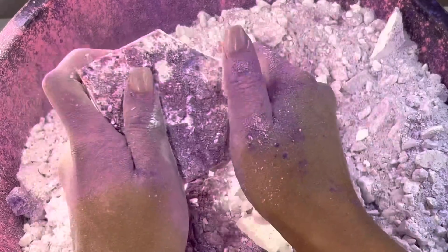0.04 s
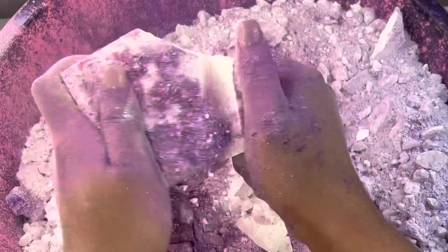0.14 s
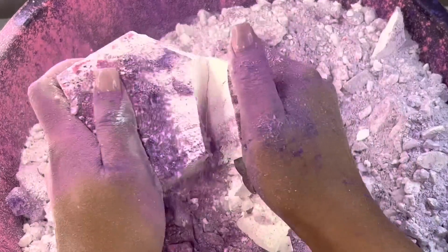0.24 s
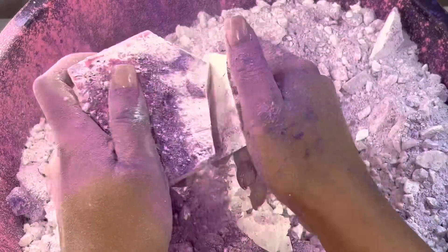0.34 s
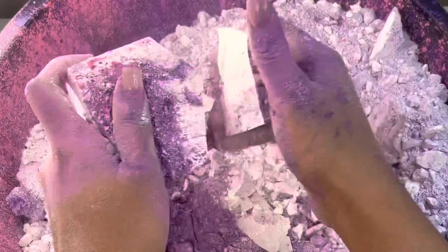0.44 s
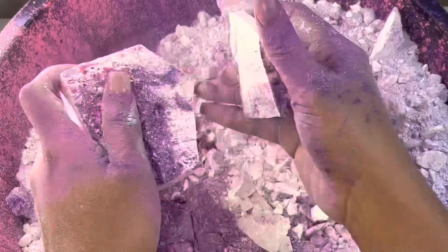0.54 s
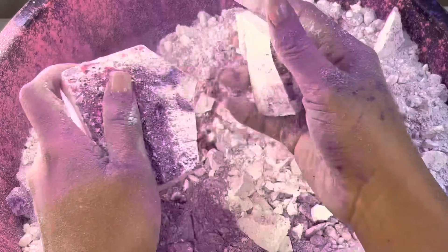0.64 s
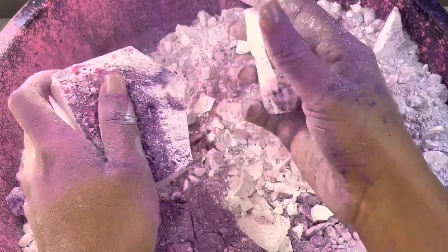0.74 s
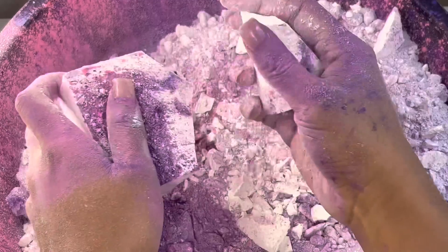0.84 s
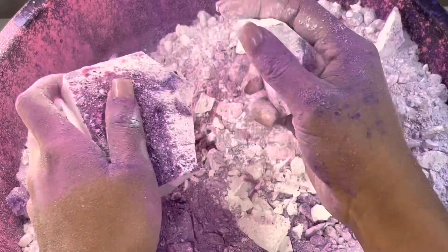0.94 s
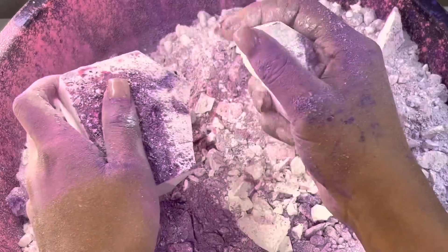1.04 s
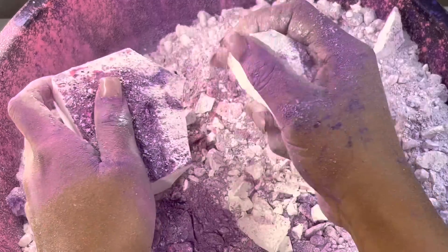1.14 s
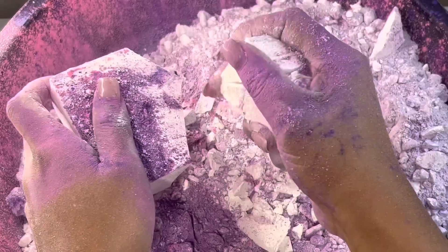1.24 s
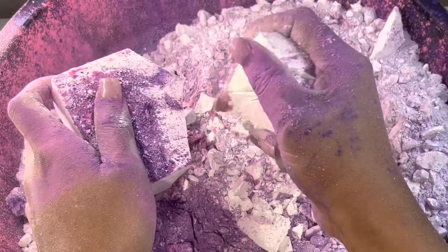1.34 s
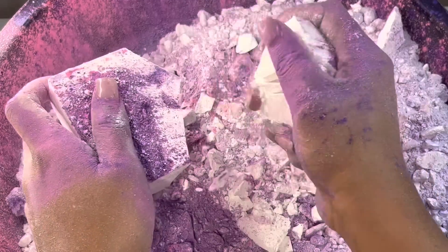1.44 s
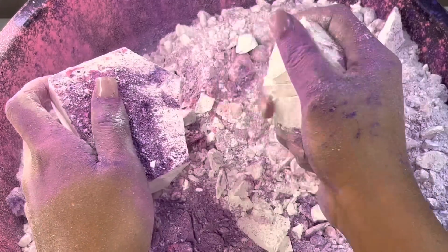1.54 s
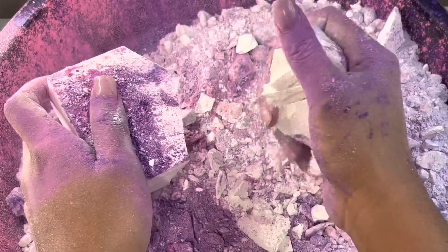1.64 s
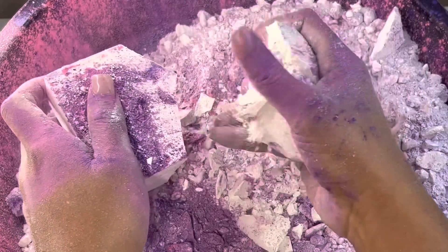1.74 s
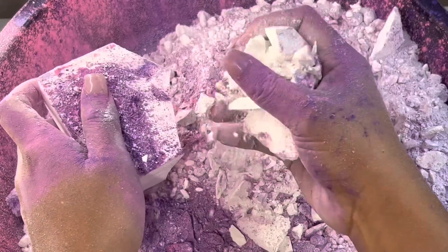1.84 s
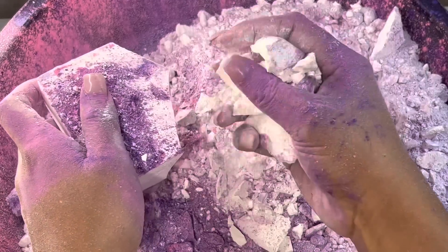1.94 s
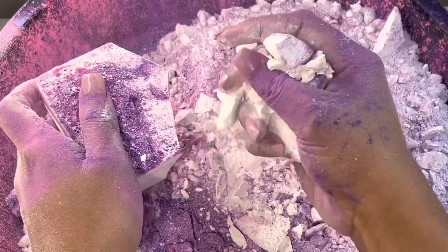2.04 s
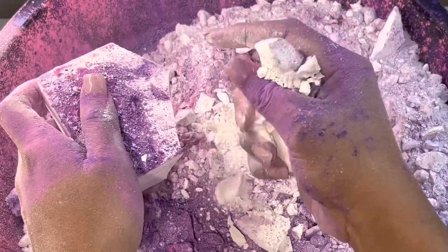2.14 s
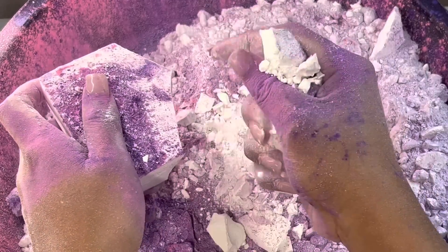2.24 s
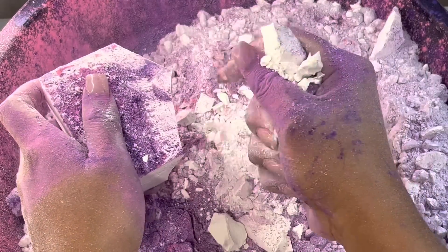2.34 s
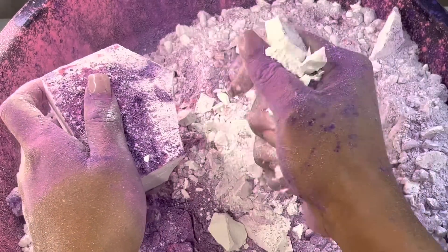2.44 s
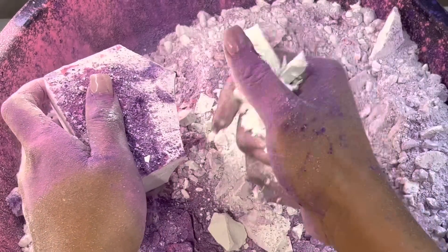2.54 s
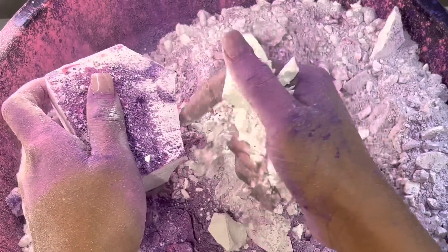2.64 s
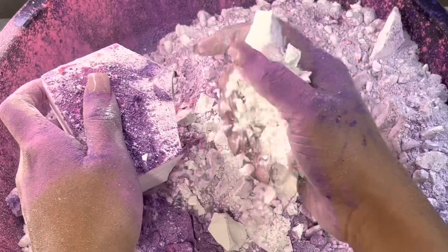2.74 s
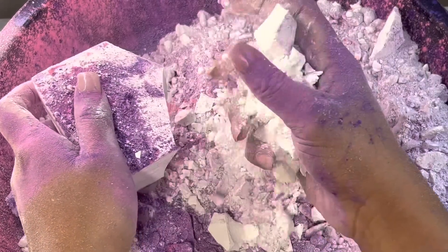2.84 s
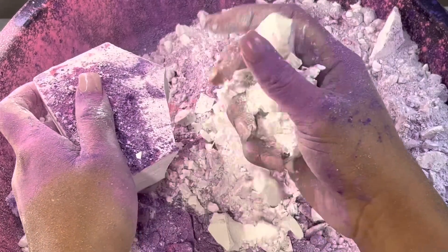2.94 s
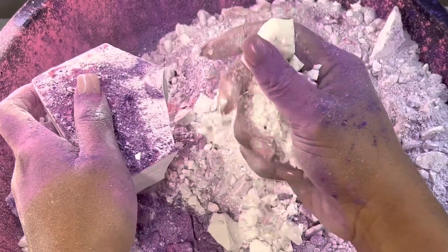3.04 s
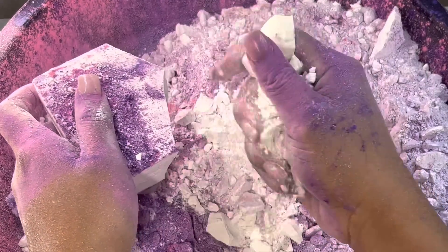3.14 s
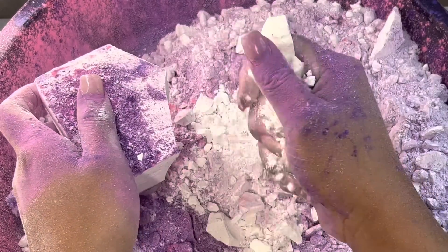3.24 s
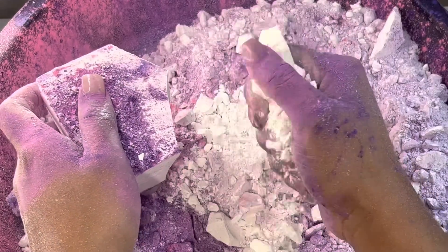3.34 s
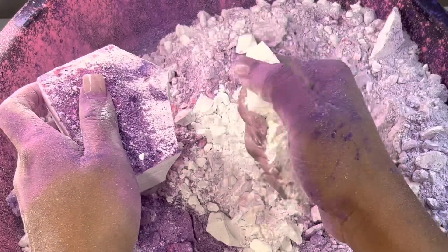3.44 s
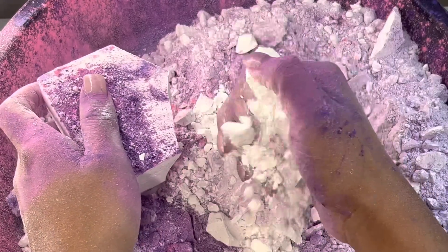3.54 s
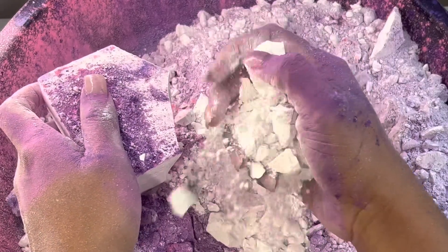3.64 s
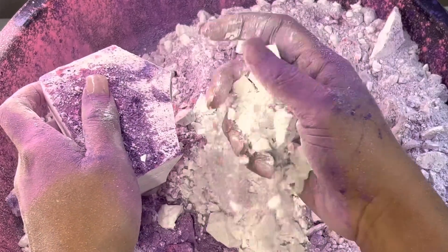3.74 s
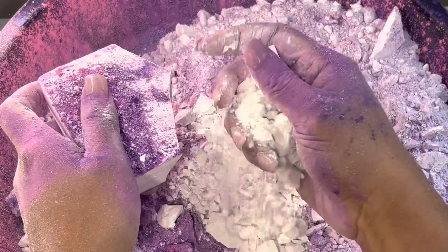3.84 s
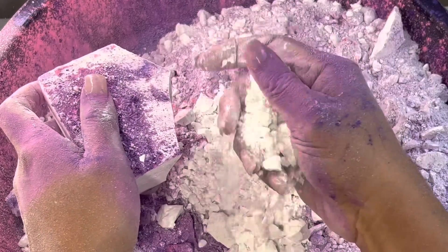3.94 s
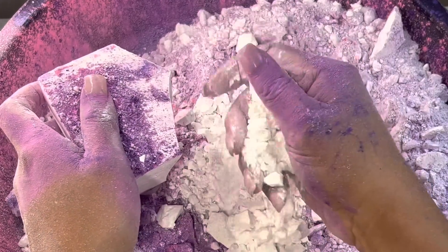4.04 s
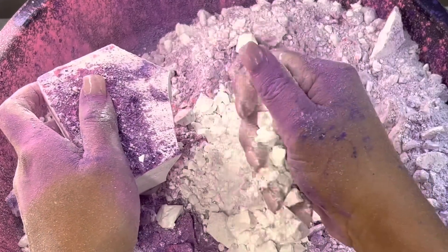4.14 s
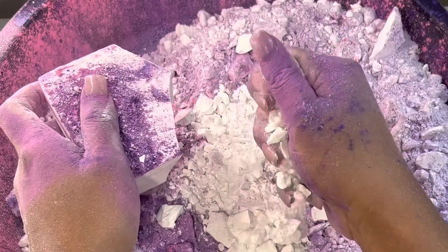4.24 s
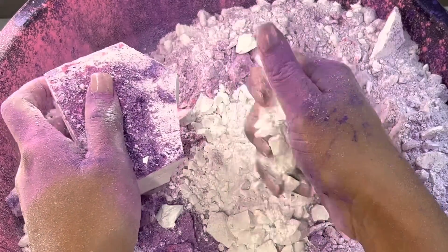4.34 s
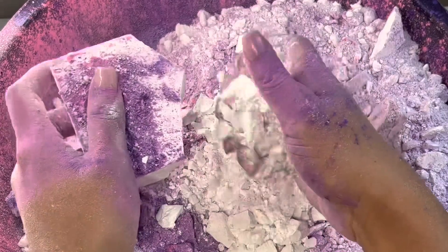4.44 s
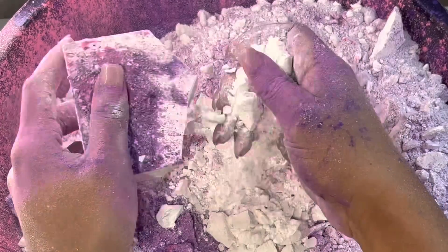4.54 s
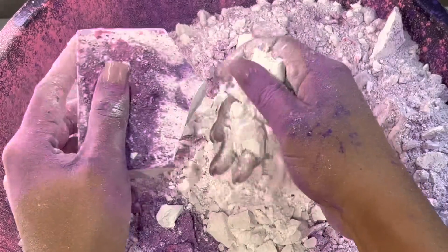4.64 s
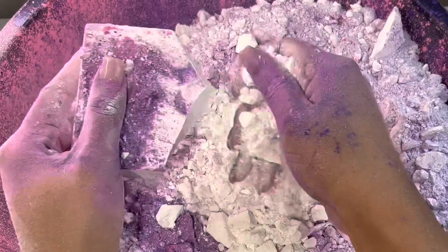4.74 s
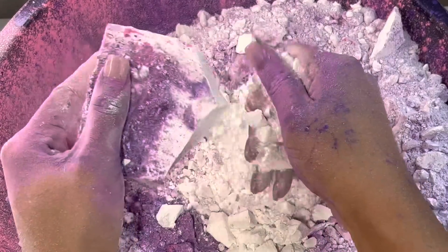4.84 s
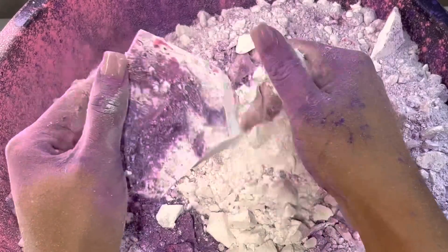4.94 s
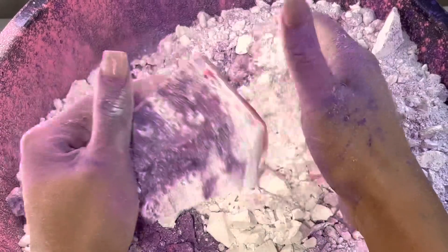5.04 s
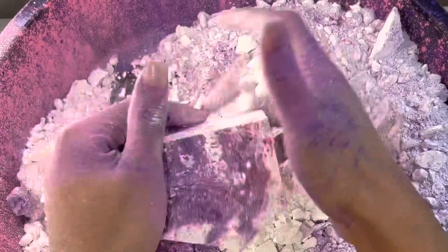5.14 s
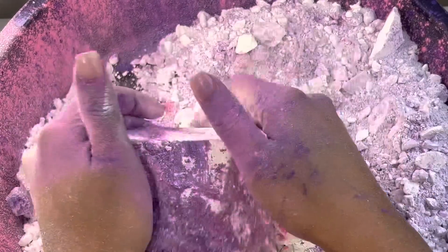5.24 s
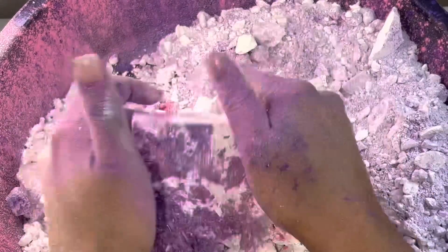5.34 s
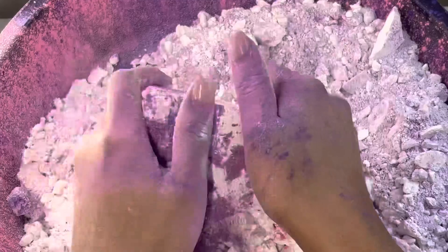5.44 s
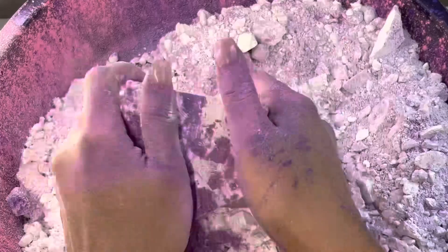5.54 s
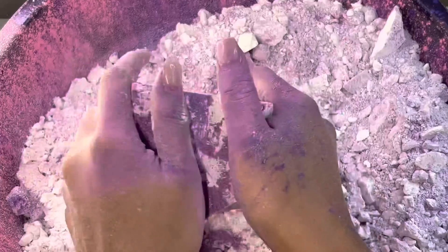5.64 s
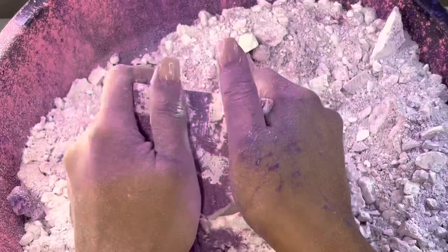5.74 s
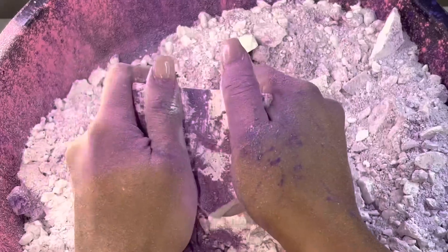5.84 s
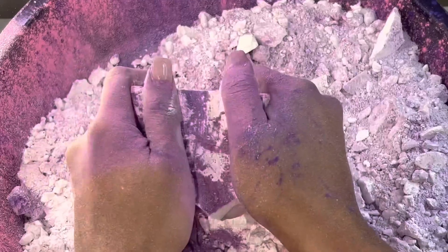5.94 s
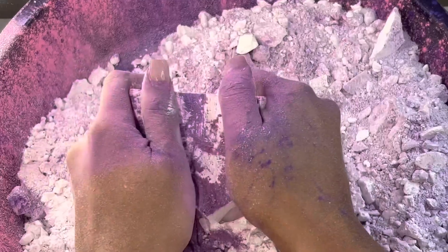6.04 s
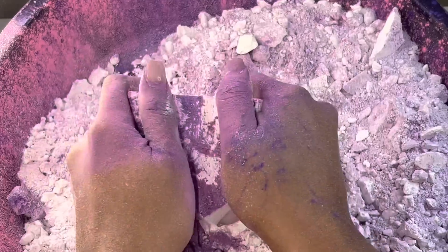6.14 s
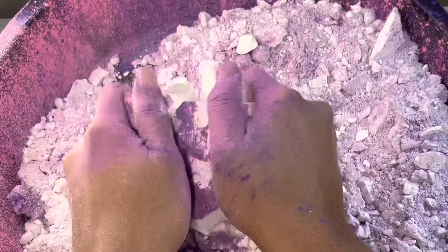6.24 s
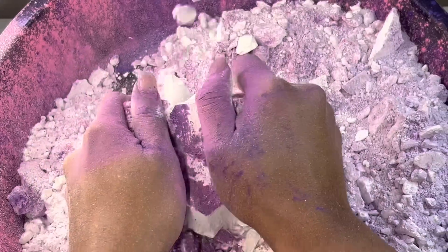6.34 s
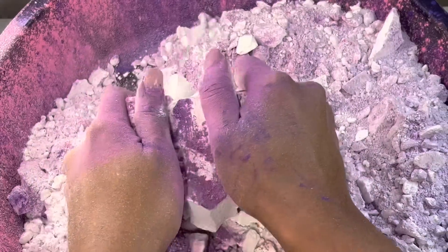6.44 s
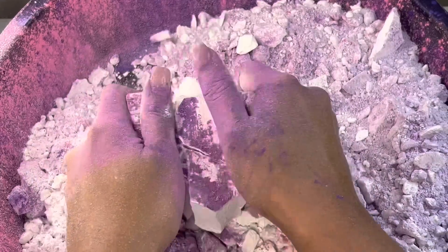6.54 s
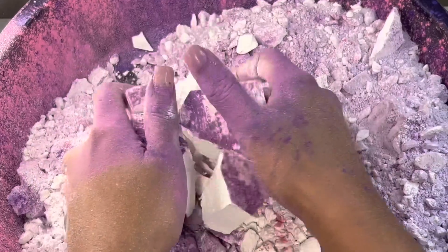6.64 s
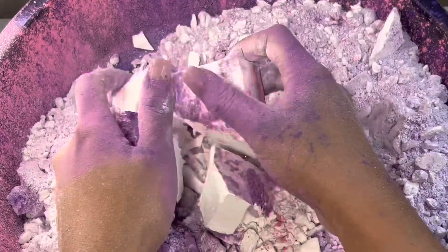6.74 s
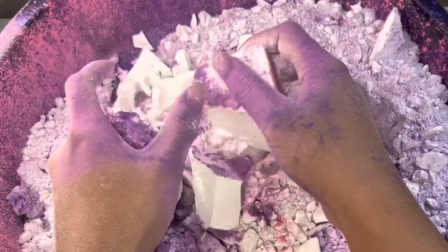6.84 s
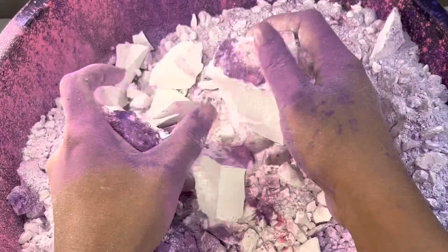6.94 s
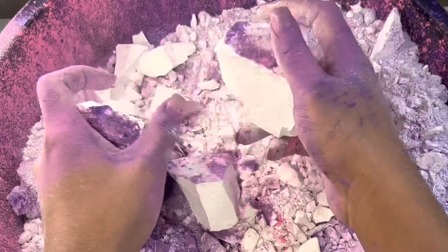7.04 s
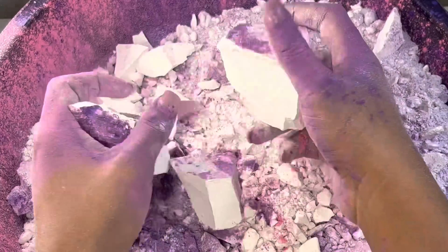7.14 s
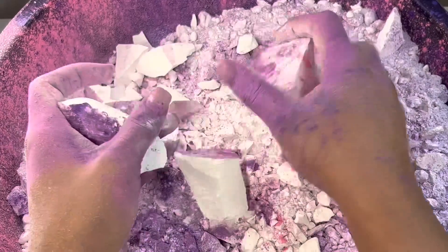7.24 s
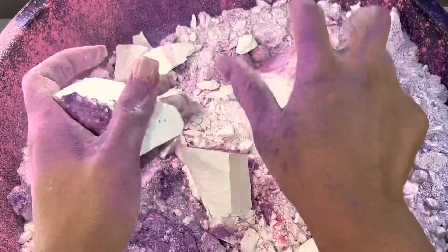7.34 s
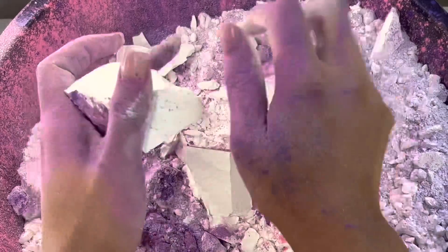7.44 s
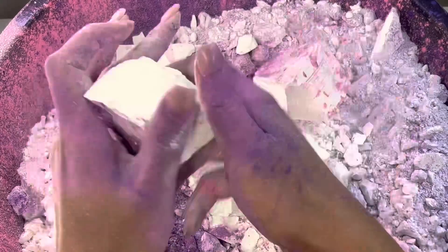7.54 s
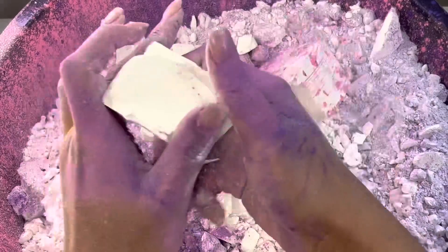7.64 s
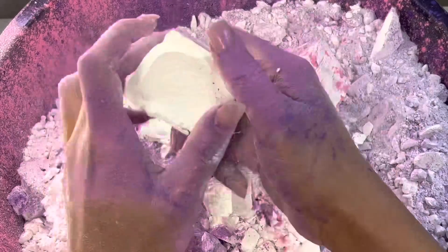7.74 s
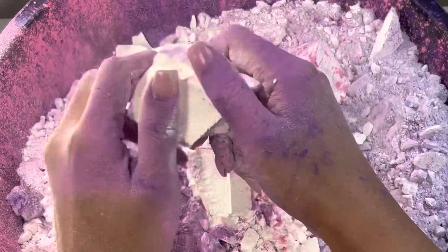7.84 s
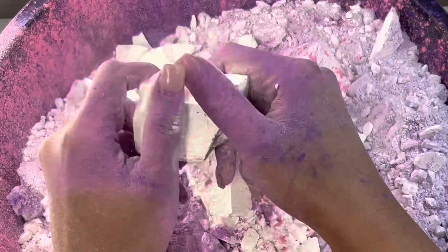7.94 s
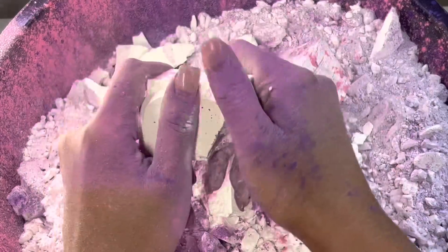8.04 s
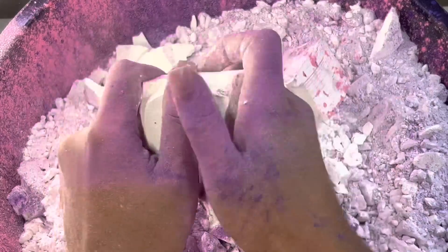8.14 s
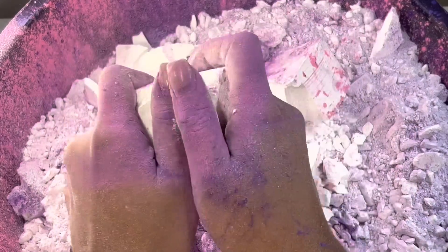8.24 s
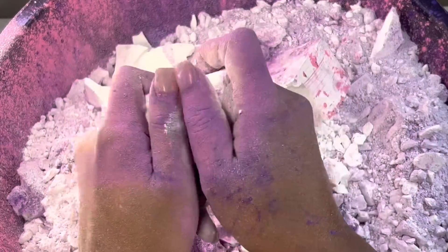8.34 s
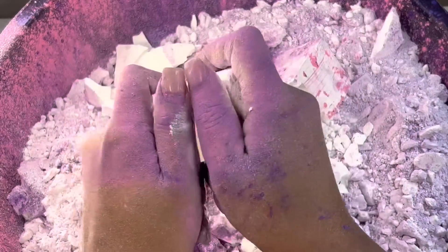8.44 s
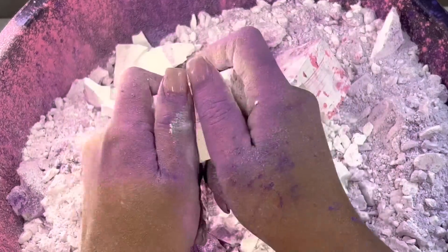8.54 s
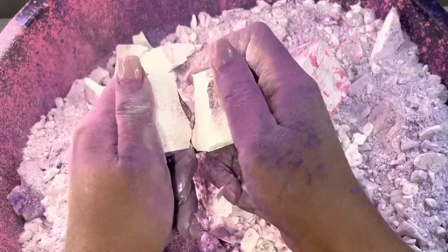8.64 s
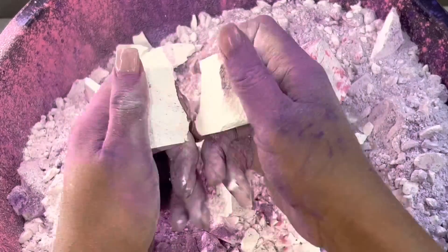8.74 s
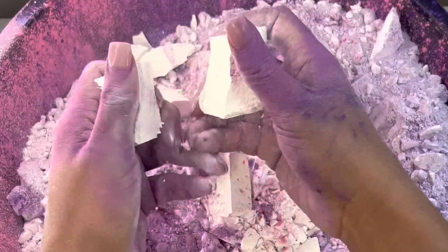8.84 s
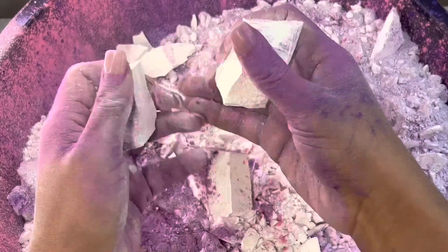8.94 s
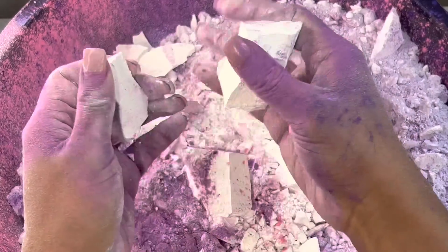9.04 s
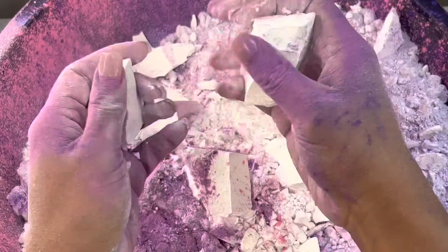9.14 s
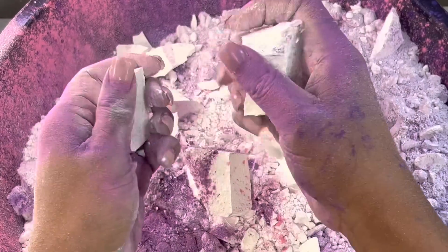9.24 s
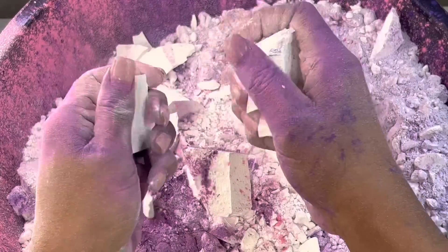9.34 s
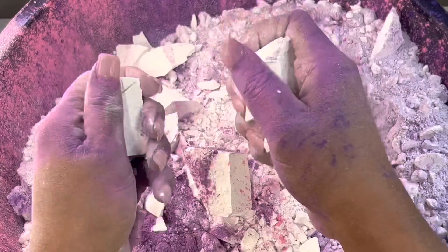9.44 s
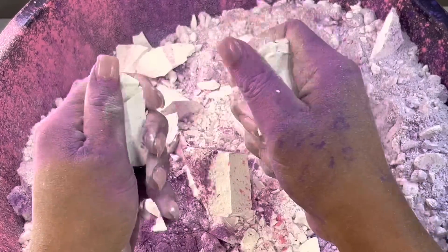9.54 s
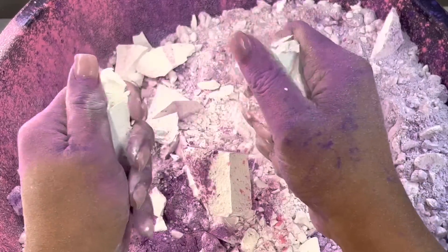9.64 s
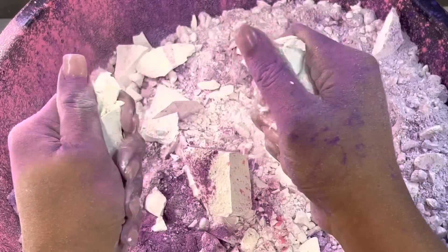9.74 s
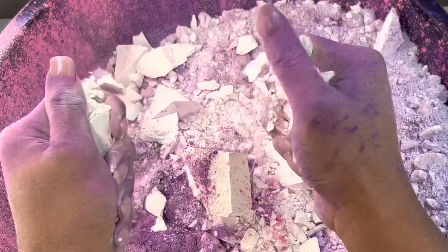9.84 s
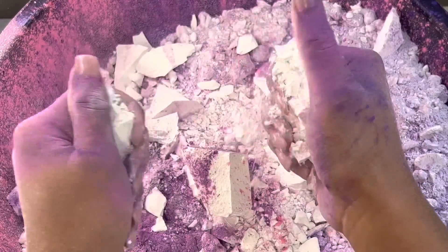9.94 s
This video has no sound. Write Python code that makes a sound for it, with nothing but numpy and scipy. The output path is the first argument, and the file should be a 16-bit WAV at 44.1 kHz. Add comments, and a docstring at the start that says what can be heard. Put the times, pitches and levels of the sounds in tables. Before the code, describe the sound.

Close, dry and gritty, in a small room with only a short faint tail and slight hiss. At 0.1 s a block snaps with a loud, low-bodied crack that thumps the tray; powdery finger rubs follow. At 1.15 s comes a brighter, very loud snap, then a cluster of splintering cracks to 1.5 s. Crushing continues from 1.8 to 4.2 s: a hard crack at 2.16 s, then smaller crunches, ticks and trickling crumbs. A sharp crack at 4.7 s and light knocks near 5.1 s lead into quiet rubbing. At 6.23 s a heavy double snap booms and rattles the tray, with crumbs spilling; two dull knocks land around 6.9 s. Soft handling and faint squeaky rubs fill 7 to 8.5 s, then one clean crack at 8.56 s. From 9.2 to 9.75 s dense, loud cracks and coarse crunching peak near 9.5 s, then thin to falling grit.

```python
"""In a small room, just below a phone, hands snap and crush hard chalk blocks over a tray of chalk crumbs.
Each crack is a burst of tiny fractures plus the short ring of the piece; scrapes and a shard ring resonances.
Crumbs grind, tick and trickle as random clicks, and skin rubs on powder as coloured dust noise.
The tray booms in decaying modes when a block jolts it, its rim and the room answer, a faint hiss lies
underneath and the loudest snaps overload."""
import sys
import numpy as np
from scipy import signal
from scipy.fft import rfft, irfft, next_fast_len
from scipy.io import wavfile
from scipy.ndimage import uniform_filter1d

SR = 44100
rng = np.random.default_rng(int(sys.argv[2]) if len(sys.argv) > 2 else 0)


def master(y):
    """Save y as 16-bit WAV."""
    cut = np.clip(np.atleast_2d(y).T, -1, 1)
    pcm = np.round(cut * 32767)  # scale
    wavfile.write(sys.argv[1], SR, pcm.astype(np.int16))


N = 440559

# cracks and knocks: (time [s], level [dB], ring of the piece [Hz], sharp edge re level [dB],
# base dying t60 [s], which each register stretches or shortens)
CRACK_EVENTS = [(.1388, 0, 700, -3, .016), (.3207, -31, 2210, -5, .012), (.409, -30, 6900, 4, .012),
                (.5806, -33, 5960, 0, .012), (1.061, -34, 2000, -20, .012), (1.082, -23, 800, -2, .019),
                (1.1172, -25, 2080, -9, .016), (1.1526, 3, 2033, -1.5, .02),
                (1.1645, -6, 3830, -14.5, .041), (1.27, -14, 4500, -6, .018), (1.282, -16, 4600, -3, .012),
                (1.3398, -20.5, 2160, -15, .018), (1.3766, -5, 900, 3, .013), (1.388, -14, 2600, 0, .035),
                (1.4135, -4, 4510, -8.5, .019), (1.4405, -7, 4450, -3, .012), (1.4712, -21, 1240, -3, .012),
                (1.507, -22, 1990, -26, .013), (1.562, -20, 1640, 0, .015), (1.578, -19, 4600, -4, .01),
                (1.8213, -25, 2240, 2, .016), (1.956, -24, 1900, -10, .015), (1.987, -24, 1800, -10, .02),
                (2.0073, -15, 3850, -9, .0098), (2.0339, -17, 4560, -7, .0083),
                (2.067, -21, 3800, -10, .01), (2.1067, -20, 4890, -7, .02), (2.139, -17, 500, -15, .03),
                (2.146, -21, 3000, 0, .02), (2.1588, -1, 780, -2, .022), (2.2289, -17, 2610, -17, .008),
                (2.26, -22, 6000, 2, .008), (2.2927, -18, 1800, -8, .012), (2.322, -25, 3200, 2, .012),
                (2.3466, -12, 4500, 0, .014), (2.3575, -13, 2990, -13, .011), (2.385, -26, 2000, -10, .01),
                (2.4172, -20, 3000, 0, .01), (2.421, -9, 2570, -6, .0083), (2.5026, -27, 4030, -5, .02),
                (2.519, -17, 3320, -4, .0078), (2.695, -27, 2400, -2, .025), (2.853, -22, 1600, -12, .012),
                (2.8617, -14, 2280, -7, .014), (2.9103, -27, 4300, -3, .019),
                (2.9791, -18.5, 840, -8, .019), (3.0032, -21, 2840, -1, .014),
                (3.0385, -24, 2600, -4, .012), (3.1186, -21, 3120, -16, .0084), (3.148, -22, 6480, 2, .015),
                (3.1697, -24, 6340, 7, .015), (3.2045, -11.5, 3930, .4, .03), (3.232, -23, 6500, 3, .007),
                (3.2774, -28, 4400, -12, .01), (3.3768, -23.5, 3880, -19, .0072),
                (3.4497, -17.5, 3360, -6, .014), (3.5769, -27.5, 1630, -13, .015),
                (3.6095, -28, 3900, -7, .015), (3.7934, -30, 5280, 11.5, .025),
                (3.853, -25, 2950, -14.5, .0066), (3.8665, -24, 3850, 2, .01),
                (3.8748, -18, 2580, -5, .0076), (3.9372, -28, 2630, -3.5, .02),
                (3.964, -19, 3830, -24, .0052), (4.0183, -28, 2900, -4, .012), (4.054, -29, 6370, 4, .014),
                (4.0832, -20, 3900, 1, .0075), (4.1177, -11, 3810, 5, .026), (4.1595, -28, 3000, 3, .013),
                (4.5522, -27, 2040, -12, .012), (4.625, -30, 900, -20, .012), (4.6779, -9, 2140, 3, .012),
                (4.703, -27, 1800, -15, .012), (4.7941, -22.5, 1980, -11, .012),
                (5.0112, -19, 1100, -12.5, .025), (5.056, -27, 2000, -12, .012),
                (5.1225, -14, 600, -20, .02), (5.1768, -13, 4000, -8, .012), (5.193, -23, 850, -15, .012),
                (5.272, -21, 900, -10, .012), (5.4406, -24, 554, -6, .017), (5.8596, -36, 1280, -6, .012),
                (6.2256, -4.5, 1275, .4, .025), (6.2353, -4, 574, -2, .07), (6.246, -11, 2500, 1, .1),
                (6.2742, -7.5, 2280, -3.5, .016), (6.4238, -25, 1490, -8, .012),
                (6.46, -27, 1100, -15, .02), (6.5849, -17, 2200, -25, .01), (6.597, -27, 2600, -12, .012),
                (6.692, -30, 5260, 3, .021), (6.7115, -27, 2900, -6, .015), (6.757, -28, 1300, -8, .025),
                (6.781, -10, 850, -8, .018), (6.818, -26, 450, -45, .015), (6.8775, -1, 724, -30, .018),
                (6.9, -23, 2800, -15, .012), (6.9302, -2, 740, -30, .016), (7.0585, -25, 644, -10, .019),
                (7.2565, -18, 1800, -14, .03), (7.5245, -27, 5100, -10, .02), (8.5609, -2, 1980, -1, .014),
                (8.7738, -15, 2600, -25, .012), (8.9292, -22.5, 6300, 4, .017),
                (8.9768, -34, 5200, 11.5, .042), (9.2232, -13.5, 2530, 5, .012),
                (9.238, -5, 1970, -3, .018), (9.2465, -10.5, 3500, 3, .013), (9.3184, .4, 1980, -3, .022),
                (9.3423, -18, 760, -18, .024), (9.3593, -6, 3400, -4, .019), (9.3921, -12.5, 2020, 3, .023),
                (9.3976, -8, 2000, -3, .028), (9.4357, -9, 2130, -5, .013), (9.4532, -10, 3970, -12, .013),
                (9.4714, -14, 3570, -6, .015), (9.4854, -18, 4370, 0, .015), (9.4995, .4, 3480, -26, .021),
                (9.51, -10.5, 4030, -1, .022), (9.5315, -8, 1264, 5, .027), (9.5788, -20, 3250, -16, .028),
                (9.598, -17, 5340, -3, .032), (9.6063, -7.5, 4500, -10, .009),
                (9.6486, -16, 1930, -20, .0093), (9.7247, -8, 2000, -1, .013),
                (9.7484, -13, 2500, -8, .011), (9.823, -19, 2110, -6, .022),
                (9.9516, -27.5, 1240, -18, .018)]
# thud of a piece ringing at 1 kHz [dB]; smaller, higher pieces thud less
BODY_DB, BODY_DB_PER_OCTAVE = -13, -9
# taps on a hard shard: (time [s], level [dB], added to the lowest mode [dB])
SHARD_TAPS = [(6.692, -25, -14), (6.713, -32, -4), (6.781, -19, 16.5), (6.836, -31, -6), (6.871, -27, -8)]
# modes of the ringing shard, lowest first: (frequency [Hz], level [dB], t60 [s])
SHARD_MODES = [(2890, 0, .15), (4720, 0, .04), (5210, 0, .04), (6060, 0, .04), (6450, -3, .03)]
# scrapes and bumps that sound one resonance of a solid piece:
# (time [s], time to peak [s], frequency [Hz], width of each of two passes [Hz], level [dB])
SCRAPE_EVENTS = [(.14, .003, 280, 200, -2), (.441, .003, 750, 500, -30), (0.794, 0.006, 249, 150, -32),
                 (1.153, .003, 550, 500, -5), (1.165, 0.032, 2050, 1100, -22),
                 (4.88, .035, 2300, 1400, -39), (5.739, 0.02, 800, 693, -41),
                 (5.862, 0.0076, 293, 252, -33), (6.012, .0012, 1000, 904, -16),
                 (6.014, 0.0069, 890, 700, -33), (6.236, .012, 330, 200, -11), (6.24, .012, 1050, 700, -10),
                 (6.6, 0.018, 5300, 300, -46), (6.84, .015, 800, 500, -29), (6.88, 0.025, 900, 600, -25),
                 (7.63, .025, 6130, 301, -41), (7.831, 0.0014, 3830, 2500, -35),
                 (7.841, 0.027, 5930, 300, -42), (8.351, 0.00097, 3500, 3010, -32.5),
                 (8.5605, .0015, 880, 450, -10), (8.565, 0.035, 2050, 700, -29),
                 (8.563, .003, 280, 200, -13), (8.57, .022, 780, 600, -27), (9.319, .002, 730, 350, -11),
                 (9.394, .005, 780, 200, -18)]
# slow work of the hands:
# (time [s], crumbs grinding [dB], lumps shifting [dB], weight on the tray [dB])
HAND_WORK = [(0, -68, -75, -44), (.25, -64, -37, -39), (.85, -70, -60, -43), (1.3, -43, -50, -39),
             (1.6, -40, -48, -43), (1.95, -42, -36, -40), (2.35, -47, -44, -46), (2.65, -62, -75, -55),
             (3.06, -39, -55, -46), (3.35, -48, -62, -51), (3.8, -47, -50, -48), (4.3, -64, -68, -52),
             (4.6, -50, -46, -55), (5.4, -54, -43, -41), (5.65, -74, -53, -42), (6.18, -72, -61, -43),
             (6.37, -44, -35, -29), (6.55, -58, -43, -40), (7.05, -60, -37, -37), (7.35, -68, -60, -48),
             (7.65, -62, -55, -50), (7.85, -64, -68, -52), (8.5, -68, -66, -57), (9.2, -56, -50, -44),
             (9.45, -32, -58, -30), (9.68, -48, -68, -49.5), (9.99, -52, -54, -59)]
# single strokes of the fingers:
# (time of the peak [s], crumbs [dB], skin on powder [dB], fading by 30 dB in [s])
FINGER_STROKES = [(.33, -43, -41, .06), (.42, -39, -31, .1), (.52, -52, -42, .1), (.58, -46, -30, .05),
                  (.73, -55, -43, .12), (.94, -54, -49, .08), (1.07, -46, -52, .15), (1.32, -38, -37, .1),
                  (1.37, -27, -30, .06), (1.67, -38, -45, .2), (1.78, -38, -38, .18), (2.02, -32, -39, .1),
                  (2.12, -33, -33, .1), (2.31, -35, -38, .12), (2.55, -42, -34, .07), (2.67, -42, -35, .07),
                  (2.71, -41, -43, .07), (2.83, -41, -44, .06), (2.86, -40, -52, .08),
                  (2.92, -40, -39, .12), (3.06, -34, -36, .1), (3.17, -42, -33, .07), (3.22, -39, -38, .11),
                  (3.4, -43, -52, .15), (3.48, -35.5, -39, .08), (3.62, -42, -43, .17), (3.8, -40, -46, .1),
                  (3.87, -35, -35, .07), (4.12, -36, -36, .15), (4.36, -48, -58, .2), (4.54, -41, -42, .15),
                  (4.63, -42, -34, .14), (4.94, -43, -34, .16), (5.03, -44, -31, .12), (5.19, -44, -34, .2),
                  (5.44, -43, -39, .13), (5.53, -37, -30, .09), (5.865, -50, -58, .04),
                  (6.59, -49, -50, .1), (6.76, -40, -38, .06), (6.88, -50, -38, .15), (7.09, -50, -35, .08),
                  (7.255, -38, -58, .07), (7.43, -58, -48, .08), (7.56, -54, -41, .1), (7.66, -54, -35, .1),
                  (7.74, -50, -33, .09), (7.87, -56, -34.5, .1), (8.01, -56, -38, .08),
                  (8.12, -60, -38, .045), (8.28, -52, -42, .08), (8.33, -49, -44, .07),
                  (8.82, -52, -36, .1), (8.92, -44, -37, .1), (9.08, -47, -35.5, .15), (9.17, -42, -41, .1),
                  (9.33, -33, -39, .15), (9.52, -22, -28, .2), (9.62, -32, -32, .07), (9.77, -31, -37, .17),
                  (9.97, -40, -52, .04)]
STROKE_RISE_SHARE = .7  # a stroke swells in this share of its fading time
STROKE_ROUNDNESS = 1.5  # 1 = pointed peak, 2 = bell
GRIND_DUST_DB = -6  # powder re grinding crumbs
TRICKLE_DB = -63  # fine powder never stops trickling
SPILL_T60_S, SPILL_DUST_DB = .4, -4  # dust re spilling crumbs
# colour of the crumbs: (frequency [Hz], width [Hz], level [dB])
CRUMB_COLOUR = [(800, 2600, -9), (2240, 2700, 8.5), (3600, 500, -6)]
# colour of powder and sharp edges: (frequency [Hz], width [Hz], level [dB])
POWDER_COLOUR = [(6026, 1980, -0.5), (7490, 2620, -4), (12000, 2000, -18), (15020, 690, -4)]
# squeaks of a rubbed block, each resonance passed twice:
# (frequency [Hz], width per pass [Hz], level per pass [dB])
SQUEAK_MODES = [(4050, 300, -2), (4800, 300, -1), (5280, 300, 1.5), (5900, 330, 1.5), (6200, 330, 1.5),
                (6700, 350, .4), (7250, 350, 1.5), (7700, 350, 1.5), (8200, 380, 1.5), (8800, 400, 1.5)]
# colour of lumps and loose pieces: (frequency [Hz], width [Hz], level [dB])
LUMP_COLOUR = [(294, 360, 22.5), (444, 390, 17.5)]
# sizes of snapping chip: (frequency [Hz], width [Hz], level [dB])
CHIP_SIZES = [(1400, 1200, -4), (2500, 1600, -1), (4200, 2500, -1.5), (6800, 4000, -4)]
# a block jolts the tray:
# (time [s], boom [dB], loose pieces rattling [dB], crumbs spilling [dB])
TRAY_JOLTS = [(.145, -8, -20, -39), (1.165, -10, -17, -25), (1.386, -25, -38.5, -26),
              (2.161, -20.5, -22, -25), (2.421, -37, -39.5, -30), (4.69, -19, -36, -38),
              (5.125, -29, -40, -46), (6.234, -8, -6.5, -19), (6.879, -32, -24.5, -43),
              (6.931, -39, -23, -50), (7.247, -28.5, -22, -42), (8.572, -12, -26, -33),
              (8.917, -30.5, -44, -55), (9.247, -13, -40, -37)]
# modes of the tray before each jolt detunes them: (frequency [Hz], level [dB], t60 [s])
TRAY_MODES = [(67, -4.5, 0.33), (98, -8, .22), (140, -2.5, 0.3), (220, -1, 0.042), (265, -9.5, 0.3),
              (370, -16, 0.3), (430, -15, 0.24)]
# colour of the reflections off the rim: (frequency [Hz], width [Hz], level [dB])
RIM_COLOUR = [(700, 700, 1), (3300, 2500, -7)]
RIM_DB, RIM_S = -18, .012  # RIM_S: time to fall to 1/e
ROOM_T60_S, ROOM_DB, ROOM_BRIGHT_HZ = .5, -25.5, 6000
HISS_DB = -74.5
PORT_HZ, PORT_LAG_S = 8600, .000286  # above PORT_HZ the left port lags the right
TOP_HZ = 16200


def undb(db):
    """Gain of a level in dB."""
    return 10 ** (np.asarray(db) / 20)


def unit(x):
    """Scaled to rms 1."""
    return x / np.sqrt(np.mean(x ** 2))


def band(x, lo_hz, hi_hz):
    """Butterworth band-pass."""
    return signal.sosfilt(signal.butter(2, [lo_hz, hi_hz], "band", fs=SR, output="sos"), x)


def ring(x, resonances):
    """Sum of (Hz, width, dB) resonances."""
    return sum(undb(db) * signal.lfilter(*signal.iirpeak(hz, hz / width, SR), x)
               for hz, width, db in resonances)


def shaped(envelope, noise, colour):
    """Noise under an envelope, then coloured; an envelope of 1 gives rms 1."""
    return colour(envelope * noise) / np.std(colour(noise))


def grains(per_s, spread_db):
    """Dense random clicks, a few of them far larger than the rest."""
    hit = rng.random(N) < per_s / SR
    size_db = spread_db * np.minimum(rng.exponential(size=N), 4)
    return unit(hit * rng.standard_normal(N) * undb(size_db))


def walk(rate):
    """Random levels, a new one every 1 / rate s, with glides between; spread a little under 1."""
    k = int(SR / rate)
    return uniform_filter1d(np.repeat(rng.standard_normal(N // k + 1), k), k)[:N]


def curves(table):
    """Columns of a table as sample-rate curves."""
    s, *columns = np.transpose(table)
    return [np.interp(np.arange(N) / SR, s, c) for c in columns]


def cracks(rise_s=.0002, ring_db=1.5, ring_share=.7, body_share=2.76, edge_share=.85,
           wide_db=-4, wide_share=1.0, sharpness=3, piece_db=-1.5, dust_db=-26, dust_t60=0.29,
           snap_db=-1, snap_share=.3, thud_db=3, thud_hz=330.):
    """Splinters excite each piece around its own ring; body, edge and a tail of debris go with it."""
    t = np.arange(SR // 8) / SR
    body, wide, edge, snap, pieces = np.zeros((5, N + len(t)))
    splinters = np.tile(grains(15000, 1.9), 2)[:N + len(t)]
    debris = undb(dust_db) * 1000 ** (-t / dust_t60) * (1 - (t / t[-1]) ** 2)
    for s, db, hz, edge_db, t60 in CRACK_EVENTS:
        body_db = BODY_DB + BODY_DB_PER_OCTAVE * (np.log2(hz) - np.log2(1000))
        dull_db = min(edge_db, 0)  # a dull edge also softens the snap
        here = slice(int(s * SR), int(s * SR) + len(t))

        def dying(share):
            return (1 - np.exp(-t / rise_s)) * 1000 ** (-t / (share * np.clip(t60, .004, .1)))

        def piece(x):
            return ring(x, [(hz, hz / sharpness, piece_db)])

        tone = np.sin(2 * np.pi * hz * t)
        thud = np.sin(2 * np.pi * thud_hz * t)
        pieces[here] += undb(db) * shaped(dying(0.8) + debris, splinters[here], piece)
        pieces[here] += undb(db + ring_db) * dying(ring_share) * tone
        pieces[here] += undb(db + body_db + thud_db) * dying(1.5) * thud
        snap[here] += undb(db + snap_db + dull_db) * dying(snap_share)
        wide[here] += undb(db + wide_db + .25 * dull_db) * dying(wide_share)
        body[here] += undb(db + body_db) * dying(body_share)
        edge[here] += undb(db + edge_db) * (dying(edge_share) + debris)
    low = shaped(body, splinters, lambda x: band(x, 180, 756))
    middle = shaped(wide, splinters, lambda x: band(x, 830, 3330))
    high = shaped(edge, splinters, lambda x: ring(band(x, 5360, 12000), POWDER_COLOUR))
    full = shaped(snap, splinters, lambda x: band(x, 1500, 16000))
    return (full + low + middle + high + pieces)[:N]


def shard(rise_s=.0008, grip_s=.0072):
    """Each tap sounds the clear modes of the shard until the fingers damp it."""
    t = np.arange(SR // 10) / SR
    out = np.zeros(N + len(t))
    phases = 2 * np.pi * rng.random((len(SHARD_TAPS), len(SHARD_MODES)))
    held = (1 - np.exp(-t / rise_s)) * np.exp(-(t / grip_s) ** 6)
    for (s, db, low_db), phase in zip(SHARD_TAPS, phases):
        modes = [undb(mode_db) * 1000 ** (-t / t60) * np.sin(2 * np.pi * hz * t + p)
                 for (hz, mode_db, t60), p in zip(SHARD_MODES, phase)]
        tone = undb(low_db) * modes[0] + sum(modes[1:])
        out[int(s * SR):int(s * SR) + len(t)] += undb(db) * held * tone
    return out[:N]


def scrapes():
    """Friction noise swells, fades and rings one resonance, applied twice for steep flanks."""
    t = np.arange(SR // 4) / SR
    out = np.zeros(N + len(t))
    noises = rng.standard_normal((len(SCRAPE_EVENTS), len(t)))
    for (s, peak_s, hz, width, db), noise in zip(SCRAPE_EVENTS, noises):
        swell = t / peak_s * np.exp(1 - t / peak_s)

        def piece(x):
            return ring(ring(x, [(hz, width, 0)]), [(hz, width, 0)])

        out[int(s * SR):int(s * SR) + len(t)] += undb(db) * shaped(swell, noise, piece)
    return out[:N]


def fingers(grind_db):
    """Levels of crumbs and powder: steady grinding, strokes that swell and fade, spills after jolts."""
    step = SR // 1000
    t, grind_db = np.arange(0, N, step) / SR, grind_db[::step]
    # powers add
    crumbs = undb(2 * grind_db)
    powder = undb(2 * (grind_db + GRIND_DUST_DB)) + undb(2 * TRICKLE_DB)
    for s, crumb_db, powder_db, fade_s in FINGER_STROKES:
        flank_s = np.where(t < s, STROKE_RISE_SHARE * fade_s, fade_s)
        stroke = 1000. ** -(np.abs(t - s) / flank_s) ** STROKE_ROUNDNESS
        crumbs = crumbs + undb(2 * crumb_db) * stroke
        powder = powder + undb(2 * powder_db) * stroke
    for s, _, _, spill_db in TRAY_JOLTS:
        fallen_db = 20 * np.log10(1000) * np.abs(t - s) / SPILL_T60_S
        spill = (t > s) * undb(2 * (spill_db - fallen_db))
        crumbs = crumbs + spill
        powder = powder + undb(2 * SPILL_DUST_DB) * spill
    return curves(np.transpose([t, 10 * np.log10(crumbs), 10 * np.log10(powder)]))


def crumbling(crumb_db, powder_db, lump_db, crackle_db=-5, crackle_s=.0008, top_db=-34):
    """Crumbs click densely with lone crackles, skin hisses over powder, lumps knock dully."""
    crumbs = unit(ring(grains(4000, 1.54), CRUMB_COLOUR)) * undb(np.minimum(5.0 * walk(90), 6.0))
    fade = np.exp(-np.arange(SR // 100) / SR / crackle_s)
    bursts = np.abs(np.convolve(grains(200, 1.1), fade, "same"))
    crackles = unit(ring(bursts * rng.standard_normal(N), CRUMB_COLOUR)) * undb(crackle_db)
    dust = band(grains(8000, 2.3), 3500, 21000)
    # each resonance comes and goes as the grip shifts
    skin = sum(ring(dust, [mode]) * undb(3.8 * walk(18)) for mode in POWDER_COLOUR)
    skin = unit(skin) * undb(3.4 * walk(60))
    # the rubbed block sings now in one mode, now in another
    squeak = sum(ring(ring(dust, [mode]), [mode]) * undb(6.5 * walk(12)) for mode in SQUEAK_MODES)
    powder = unit(skin + undb(-5.0) * unit(squeak))
    knocks = band(ring(grains(4000, 1.2), LUMP_COLOUR), 150, 1100)
    lumps = unit(knocks) * undb(1.5 + 3.8 * walk(22))
    crumbs = undb(crumb_db) * crumbs + undb(np.minimum(crumb_db, top_db)) * crackles
    return crumbs + undb(powder_db) * powder + undb(lump_db) * lumps


def ticks(crumb_db, tick_db=-2, tick_s=.0012, top_db=-37):
    """Small chips snap at random while crumbs grind; each size has its own ring."""
    fade = np.exp(-np.arange(SR // 100) / SR / tick_s)
    chips = np.zeros(N)
    for chip in CHIP_SIZES:
        bursts = np.abs(signal.fftconvolve(grains(25, 1.4), fade)[:N])
        chips += ring(bursts * rng.standard_normal(N), [chip])
    return undb(np.minimum(crumb_db, top_db) + tick_db) * unit(chips)


def tray(weight_db, push_s=0.0032, rattle_t60=0.32, detune=.012, deep_detune=.08, swing_cycles=.8):
    """Jolts sound the tray's modes and shake its loose pieces; the weight of the hands makes it rumble."""
    t = np.arange(SR // 2) / SR
    knocks, shakes = np.zeros(N + len(t)), np.zeros(N)
    # the load on the tray differs at every jolt, and so do its modes
    loads = rng.standard_normal((len(TRAY_JOLTS), len(TRAY_MODES)))
    for (s, db, rattle_db, _), load in zip(TRAY_JOLTS, loads):
        boom = np.zeros(len(t))
        for (hz, mode_db, t60), shift in zip(TRAY_MODES, load):
            loaded_hz = hz * (1 + (detune if hz > 100 else deep_detune) * shift)
            swing = (1 - np.exp(-t * hz / swing_cycles)) * 1000 ** (-t / t60)
            boom += undb(mode_db) * swing * np.sin(2 * np.pi * loaded_hz * t)
        knocks[int(s * SR):int(s * SR) + len(t)] += undb(db) * boom
        shakes[int(s * SR)] = undb(rattle_db)
    push = np.hanning(int(push_s * SR))  # a soft push rounds off each boom
    shaking = signal.fftconvolve(shakes, 1000 ** (-t / rattle_t60))[:N]
    rattle = shaking * unit(band(ring(grains(3000, 1.4), LUMP_COLOUR), 180, 2000))
    rumble = unit(ring(rng.standard_normal(N), [(58, 23, 7.5), (99, 20, -4), (140, 63, -8.5)]))
    rumble *= undb(weight_db + 3.8 * walk(14))
    return np.convolve(knocks, push / push.sum())[:N] + rattle + rumble


def rim(x):
    """Quick reflections off the rim of the tray, opposite in sign at the two ports."""
    t = np.arange(SR // 15) / SR
    echo = ring(rng.standard_normal(len(t)) * np.exp(-t / RIM_S), RIM_COLOUR)
    reflected = signal.fftconvolve(x, echo / np.linalg.norm(echo))[:N]
    return undb(RIM_DB) * reflected * np.array([[1], [-1]])


def room(x):
    """A dull decaying tail, unrelated left and right."""
    t = np.arange(SR // 2) / SR
    tail = band(rng.standard_normal((2, len(t))), 150, ROOM_BRIGHT_HZ)
    tail = tail * 1000 ** (-t / ROOM_T60_S) * (t > .003)
    tail /= np.sqrt(np.sum(tail ** 2, axis=1, keepdims=True))
    return undb(ROOM_DB) * signal.fftconvolve(x[None], tail, axes=1)[:, :N]


def scene():
    """The close sound reaches both ports in step up to PORT_HZ; above it the left lags the right."""
    grind_db, lump_db, weight_db = curves(HAND_WORK)
    crumb_db, powder_db = fingers(grind_db)
    near = cracks() + shard() + scrapes() + crumbling(crumb_db, powder_db, lump_db) + ticks(crumb_db)
    close = near + tray(weight_db)
    size = next_fast_len(N)
    above_hz = np.maximum(np.fft.rfftfreq(size, 1 / SR) - PORT_HZ, 0)
    half_lag = np.pi * PORT_LAG_S * above_hz  # phase [rad]: left late, right early
    turn = np.exp(1j * np.array([-half_lag, half_lag]))
    ports = irfft(rfft(close, size) * turn, size)[:, :N]
    hiss = undb(HISS_DB) * rng.standard_normal((2, N))
    return ports + rim(close) + room(near) + hiss


def record(dry):
    """The phone drops the deepest bass, clips the loudest snaps and cuts the top."""
    lean = signal.sosfilt(signal.butter(2, 38, "high", fs=SR, output="sos"), dry)
    clipped = np.clip(lean, -1, 1)
    return signal.sosfilt(signal.ellip(8, .2, 70, TOP_HZ, fs=SR, output="sos"), clipped)


dry = scene()
out = record(dry)
master(out)
```